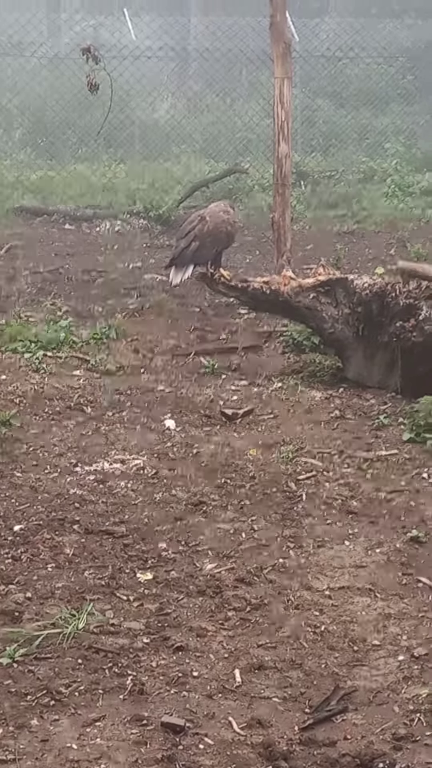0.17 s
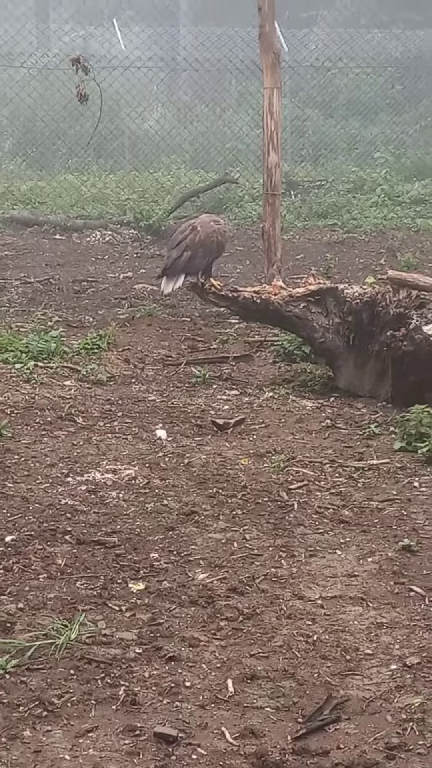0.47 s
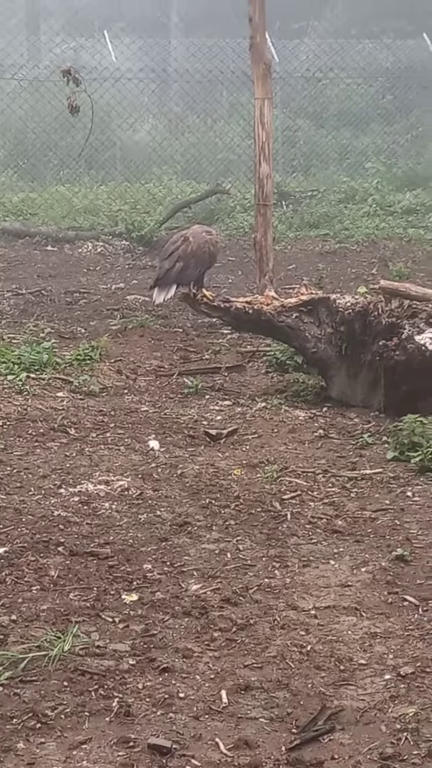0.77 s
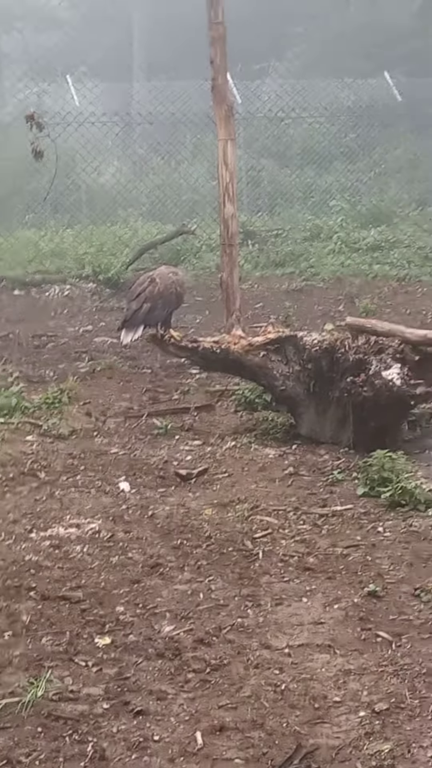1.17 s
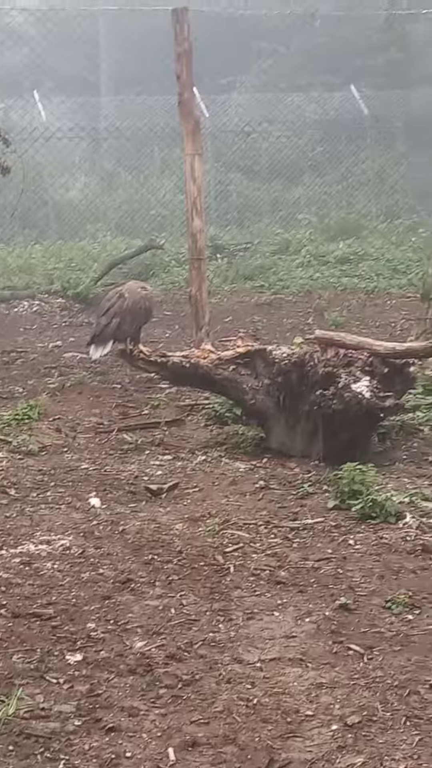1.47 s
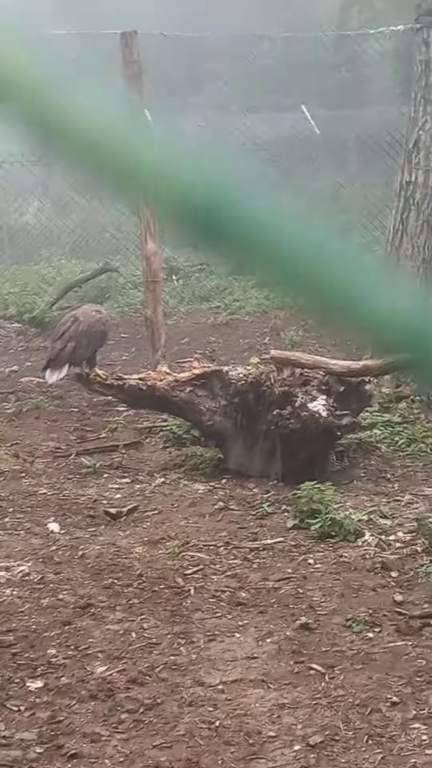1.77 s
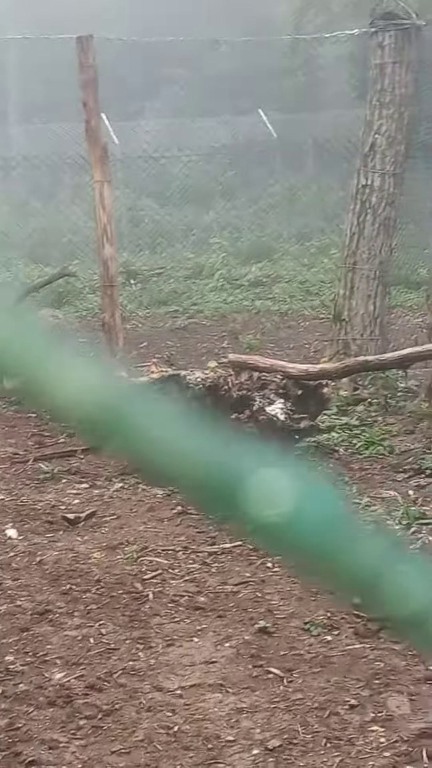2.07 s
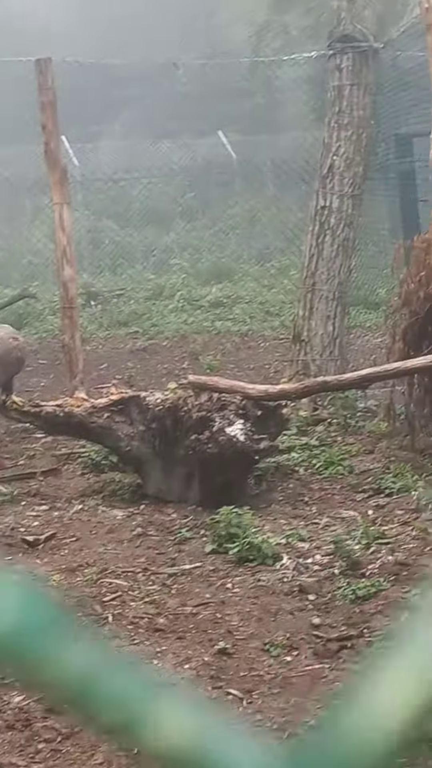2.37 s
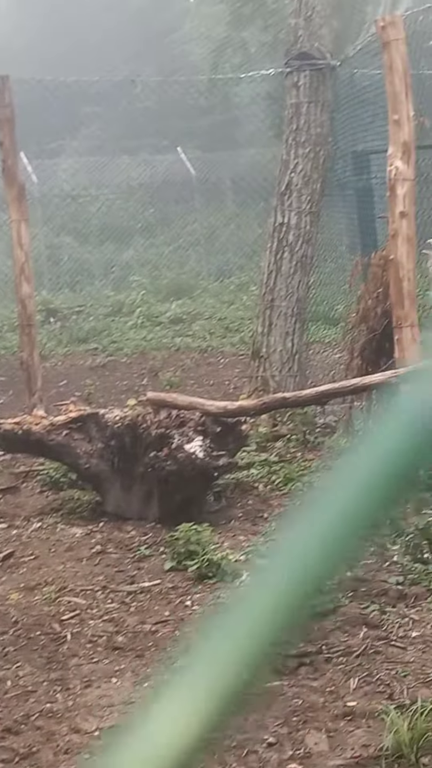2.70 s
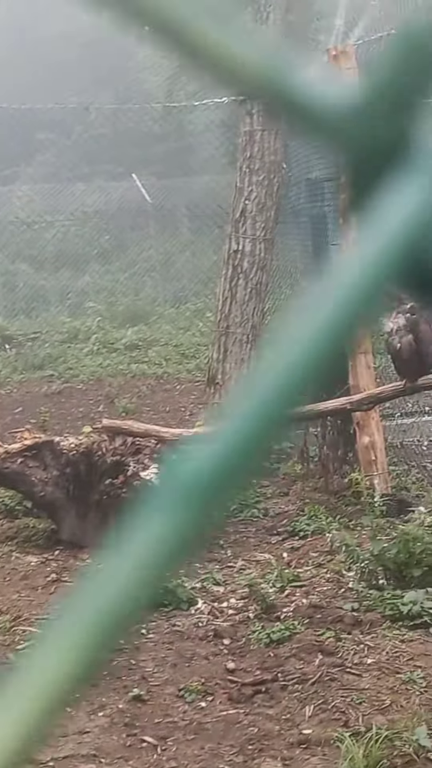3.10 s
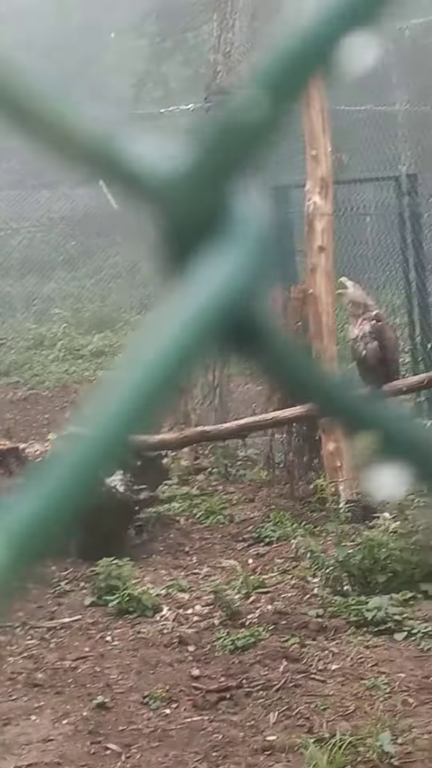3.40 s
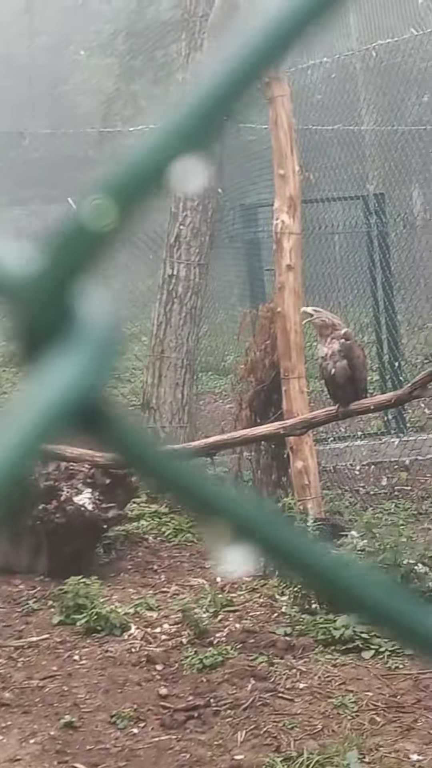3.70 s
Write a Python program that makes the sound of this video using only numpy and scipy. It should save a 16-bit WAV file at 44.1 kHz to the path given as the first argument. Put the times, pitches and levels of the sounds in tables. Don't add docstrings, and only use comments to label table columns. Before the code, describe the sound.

Harsh yelping eagle calls are already under way at the start and continue evenly to the end, scattered by trunks and fence, with thin far-off trills, tiny drips and soft air hiss behind, in close stereo pickup.

```python
import sys
import numpy as np
from scipy import signal
from scipy.fft import rfft, irfft
from scipy.io import wavfile
from scipy.ndimage import uniform_filter1d

SR = 44100
rng = np.random.default_rng(int(sys.argv[2]) if len(sys.argv) > 2 else 0)


def volts_from_decibels(level):
    exponent = np.asarray(level, float) / 20
    return 10 ** exponent


def wav_out(sig):
    wavfile.write(sys.argv[1], SR, np.round(np.clip(np.atleast_2d(sig).T, -1, 1) * 32767).astype(np.int16))


N = 169785
PRE = 8214
JITTER = 0.028


def rms_one(x):
    return x / np.sqrt(np.mean(x ** 2) + 1e-20)


def read(points, x):
    return np.interp(x, *np.transpose(points))


def at_hz(points, hz):
    table_hz, value = np.transpose(points)
    return np.interp(np.log(np.maximum(hz, 1)), np.log(table_hz), value)


def wobble(size, rate_hz):
    lowpass = signal.butter(2, rate_hz, fs=SR, output="sos")
    return rms_one(signal.sosfilt(lowpass, rng.standard_normal(size + 999))[999:])


def tone(hz):
    return np.sin(2 * np.pi * np.cumsum(hz) / SR)


def add(out, start_s, x):
    i = PRE + int(round(start_s * SR))
    out[i:i + len(x)] += x[:len(out) - i]


def left_right(db):
    return volts_from_decibels(np.array([[db / 2], [-db / 2]]))


def stereo(mid, side, alike):
    return np.sqrt(1 + alike) * mid + np.sqrt(1 - alike) * side * [[1], [-1]]


def colour(x, spectrum):
    size = x.shape[-1]
    return irfft(rfft(x) * volts_from_decibels(at_hz(spectrum, np.fft.rfftfreq(size, 1 / SR))), size)


def resonance(x, hz, width_hz):
    r = np.exp(-np.pi * width_hz / SR)
    poles = [1, -2 * r * np.cos(2 * np.pi * hz / SR), r * r]
    return signal.lfilter((1 - r * r) / 2 * np.array([1, 0, -1]), poles, x + 1e-18)


def eagle():
    # start_s, hold_pitch_hz, rise_db, hold_db, fall_db
    yelps = [(-.092, 1950, -32, -36.5, -32.5), (.174, 1950, -39, -39, -26.5), (.415, 1950, -35, -36, -34.5),
             (.651, 1970, -37, -38.5, -36.5), (.887, 1950, -35, -36, -31),
             (1.121, 1950, -36.5, -37.5, -32.5), (1.357, 1950, -41, -42.5, -39),
             (1.565, 1950, -36, -35.5, -32.5), (1.798, 1950, -38.5, -34.5, -36.5),
             (2.027, 1950, -34.5, -36.5, -35), (2.26, 1950, -34, -37, -34.5),
             (2.494, 1950, -38.5, -32.5, -38.5), (2.725, 1927, -35.5, -34.5, -36.5),
             (2.957, 1950, -37.5, -33, -34.5), (3.190, 1950, -35, -33.5, -37.5),
             (3.488, 1950, -38.5, -34.5, -36.5)]
    # rise_s, hold_s, fall_s, croak_s
    pushes = [(0.015, .039, .057, .070), (.016, 0.038, .060, .074), (.016, .040, 0.065, .070),
              (0.014, 0.0374, .059, .066), (0.018, 0.034, .059, .071), (0.021, .038, .058, .071),
              (.014, 0.0221, 0.032, .046), (.016, 0.035, 0.045, .066), (0.013, 0.0383, .060, .069),
              (0.015, 0.0405, .062, .071), (.017, .038, 0.051, .075), (.016, 0.042, 0.045, .069),
              (0.016, .043, .062, 0.072), (0.014, 0.033, .058, .068), (.016, .045, .058, .077),
              (.016, .042, .057, .079)]
    # fall_low_end_db, croak_db, rasp_db
    croaks = [(-6, -9.5, 4.5), (-9, 1.5, 5.5), (-1.5, 2, -3), (-6.5, 4, 2), (-10.5, 7, -2.5), (0, 3, 2.5),
              (4, 4.5, 3), (7, -5.5, -1.5), (-1, 7.5, 0), (9, 0, -0.5), (-2.5, -3, 1), (-1, 1.5, -4),
              (0, -0.5, -2), (8, 5, -2), (0, 2.5, 2.5), (6.5, 2, 3)]
    # time_s, level_db against the voice
    turning = [(0, -32), (1.5, -28), (2.0, -27), (3.85, -30.5)]
    # freq_hz, level_db
    rasp_colour = [(1500, -41), (2600, 6.5), (3000, -6), (3350, -3), (4000, 0), (5200, -15), (6600, -17.5),
                   (7300, -38)]
    # freq_hz, width_hz, level_db
    throat = [(541, 180, -17.5), (1172.5, 229, -6.5), (1603, 250, 3.5), (1996, 463, -0.5), (2298, 147, 1.5),
              (3196, 250, -14), (3880, 260, -19.5)]
    voice, rasp = np.zeros((2, N + PRE))
    t = np.arange(SR // 8) / SR
    for (start_s, hold_hz, rise_db, hold_db, fall_db), peaks, edge in zip(yelps, pushes, croaks):
        low_db, croak_db, rasp_db = edge
        end_s = peaks[-1] + 0.012
        stage = np.interp(t, np.r_[0, peaks, end_s], np.arange(6))
        gate = np.clip(t / 0.002, 0, 1) ** 2 * np.clip((end_s - t) / 0.0087, 0, 1)
        db = push_levels(stage, rise_db, hold_db, fall_db, low_db, croak_db)
        sound, breath = reed(stage, hold_hz, db)
        add(voice, start_s, gate * sound)
        add(voice, start_s, second_hum(stage, hold_db))
        swell_db = hold_db + read(turning, start_s) + rasp_db + 7 + 4.75 * wobble(len(t), 70)
        opening = np.clip(stage / 1.54, 0, 1) ** 2
        add(rasp, start_s, gate * opening * volts_from_decibels(swell_db) * breath)
    out = colour(rasp, rasp_colour)
    for k, (hz, width_hz, db) in enumerate(throat):
        out = out + (-1) ** k * volts_from_decibels(db) * resonance(voice, hz, width_hz)
    return out


def push_levels(stage, rise_db, hold_db, fall_db, low_db, croak_db):
    shoulder_db = -4
    points = [(.3, rise_db - 16), (.62, rise_db - 13), (.82, rise_db + shoulder_db), (1, rise_db),
              (1.17, rise_db + shoulder_db), (1.5, rise_db - 12),
              (1.75, hold_db + shoulder_db), (2, hold_db), (2.2, hold_db + shoulder_db), (2.55, hold_db - 13),
              (3, fall_db - max(low_db, 0)), (3.5, fall_db + min(low_db, 0)), (4, croak_db - 41)]
    return read(points, stage)


def reed(stage, hold_hz, db):
    # stage (1 rise, 2 hold, 3 fall, 4 croak, 5 end), pitch_hz
    whoop = [(0, 1130), (0.8, 1640), (1.2, 1900), (1.5, 2300), (1.8, 1930), (2.3, 2010), (2.7, 2000),
             (3.0, 1590), (3.3, 1280), (3.75, 1220), (3.82, 670), (5.0, 423)]
    size = len(stage)
    rough = np.interp(stage, [2.2, 2.7], [0.6, 1])
    tune_hz = uniform_filter1d(read(whoop, stage), size=60) * hold_hz / 1950
    hz = tune_hz * (1 + JITTER * rough * wobble(size, 600))
    phase = 2 * np.pi * np.cumsum(hz) / SR
    loss_db = np.interp(stage, [2.7, 3.7], [-17, -7])
    buzz = sum(volts_from_decibels(loss_db * (k - 1)) * np.cos(k * phase) for k in range(1, 8))
    rattle = tone(250 * (1 + 0.314 * wobble(size, 58.5)))
    depth = np.interp(stage, [1.3, 1.7, 2.3, 3.1], [0, 0.2, 0.2, 0.75])
    buzz = buzz * (1 + depth * rattle)
    air = (1 + np.cos(phase)) * rng.standard_normal((2, size))
    level = volts_from_decibels(db + 3.3 * rough * wobble(size, 130))
    return np.sqrt(2) * level * (buzz + volts_from_decibels(-8) * rough * air[0]), air[1]


def second_hum(stage, hold_db):
    size = len(stage)
    phase = 2 * np.pi * np.cumsum(1240 * (1 + JITTER * wobble(size, 110))) / SR
    swell = np.sin(np.pi * np.clip(stage / 2.52 - 0.3, 0, 1)) ** 2
    return volts_from_decibels(hold_db - 13.5 + 2.6 * wobble(size, 61)) * swell * np.cos(phase)


def direct_sound(voice):
    # freq_hz, left_lead_rad
    ports = [(1200, 0.083), (1600, 0.96), (2400, 2.06), (3200, 0.16), (4200, 0.14), (6300, 7.6)]
    # time_s, left_minus_right_db
    bearing = [(0, -5), (3.85, -10.5)]
    # delay_s, level_db, left_minus_right_db
    slaps = [(.0047, -13, 3.5), (.0093, -12, -3.5), (0.0214, -14, -2.5)]
    size = len(voice)
    lead = np.exp(1j * at_hz(ports, np.fft.rfftfreq(size, 1 / SR)))
    pan_db = read(bearing, np.arange(-PRE, N) / SR)
    left = irfft(rfft(voice) * lead, size)
    out = np.array([left * volts_from_decibels(pan_db / 2), voice * volts_from_decibels(-pan_db / 2)])
    for delay_s, db, side_db in slaps:
        out = out + volts_from_decibels(db) * left_right(side_db) * np.roll(voice, int(delay_s * SR))
    return out


def trees(x):
    t = np.arange(SR) / SR
    near = volts_from_decibels(-12) * rms_one(volts_from_decibels(-60 * t / 0.24))
    far = volts_from_decibels(-12.5) * rms_one(volts_from_decibels(-60 * t / 0.8))
    shape = (near + far) * np.clip(t / 0.0018 - 1, 0, 1)
    mid, side = rng.standard_normal((2, SR)) * shape / np.sqrt(2 * SR)
    return signal.fftconvolve(x[None], stereo(mid, side, 0.098), axes=1)[:, :len(x)]


def wood_echo(voice):
    # freq_hz, width_hz, level_db
    rings = [(1520, 260, -11.5), (2100, 110, -3.5), (2430, 130, -5.5)]
    # freq_hz, level_db
    wood = [(300, -9), (640, -4), (780, 3), (920, -7), (1300, -3), (2200, -1), (4000, 5), (8000, 10)]
    ringing = voice * volts_from_decibels(-1.0)
    for hz, width_hz, db in rings:
        ringing = ringing + volts_from_decibels(db) * resonance(voice, hz, width_hz)
    return trees(colour(ringing, wood)) * left_right(-3.5)


def hollow_hum(voice):
    # time_s, level_db
    heard = [(0, 5.5), (.55, -1), (.7, 15.5), (.9, -8), (2.2, -6), (2.35, 15.5), (2.7, 10), (3.0, -1.5),
             (3.3, 17.5), (3.6, 0)]
    return volts_from_decibels(read(heard, np.arange(-PRE, N) / SR)) * resonance(voice, 785, 22)


def small_birds():
    # start_s, length_s, pitch_hz, level_db
    trills = [(0.471, 0.61, 6570, -80.5), (0.913, 0.17, 6580, -73), (1.257, 0.081, 8880, -75),
              (1.282, 0.083, 10230, -78.5), (1.454, 0.22, 8750, -80), (1.69, 0.15, 8220, -81),
              (1.874, 0.13, 8180, -80.5), (2.114, 0.18, 8130, -74), (3.643, 0.098, 8880, -66.5),
              (3.678, 0.1, 10000, -86)]
    out = np.zeros(N + PRE)
    t = np.arange(SR // 2) / SR
    for start_s, length_s, hz, db in trills:
        slide = -0.085 * np.exp(-t / 0.03)
        flutter = 0.022 * np.sin(2 * np.pi * 90 * t + 1.4 * wobble(len(t), 60))
        pitch_hz = hz * (1 + slide + flutter + 0.025 * wobble(len(t), 900))
        gate = np.clip(t / 0.02, 0, 1) ** 2 * np.clip((length_s - t) / 0.057, 0, 1)
        level_db = db - 6 * t / length_s + 6.87 * wobble(len(t), 74)
        add(out, start_s, gate * volts_from_decibels(level_db) * tone(pitch_hz))
    return out


def dove():
    # start_s, length_s, pitch_hz, level_db
    coos = [
        (-.05, 0.1, 488, -76),
        (0.119, 0.097, 475.4, -69),
    ]
    out = np.zeros(N + PRE)
    for start_s, length_s, hz, db in coos:
        u = np.linspace(0, 1, int(length_s * SR))
        add(out, start_s, volts_from_decibels(db) * np.sin(np.pi * u) ** 0.19 * tone(hz * (1 - 0.09 * u)))
    return out


def drops():
    # time_s, peak_db, dullness_hz
    falls = [
        (1.254, -45, 1800),
        (1.385, -57.5, 12000),
        (2.19, -68, 12000),
    ]
    out = np.zeros(N + PRE)
    t = np.arange(200) / SR
    for time_s, db, hz in falls:
        tick = rng.standard_normal(len(t)) * np.exp(-t / 0.0012)
        band = signal.butter(2, [hz / 8, hz], "band", fs=SR, output="sos")
        add(out, time_s, volts_from_decibels(db) * signal.sosfilt(band, tick))
    return out


def hiss(spectrum, patchy_db):
    # freq_hz, likeness_0_to_1
    likeness = [(35, 0.6), (60, 0.8), (130, 0.06), (300, 0.4), (1000, 0.1), (8000, .0)]
    hz = np.fft.rfftfreq(N, 1 / SR)
    mid, side = rng.standard_normal((2, N))
    both = stereo(rfft(mid), rfft(side), np.clip(at_hz(likeness, hz), 0, 1))
    noise = irfft(both * volts_from_decibels(at_hz(spectrum, hz)) * (hz > 12), N)
    swell = np.interp(np.arange(N), np.linspace(0, N, num=30), rng.standard_normal(30))
    return rms_one(noise * volts_from_decibels(patchy_db * swell))


def distant_traffic():
    # freq_hz, level_db
    road = [(30, -33.5), (40, -18), (52, -4.5), (62, 0), (83, 0), (110, -6), (180, -15.5), (330, -25.5),
            (450, -47.5)]
    return volts_from_decibels(-73) * hiss(road, patchy_db=1.5) * volts_from_decibels([[0.6], [-0.6]])


def air_hiss():
    # freq_hz, level_db
    air = [(300, -0.5), (1000, -4), (2800, -14), (5200, -17), (6800, -4.5), (7300, -32), (11500, -15),
           (15300, -15)]
    return volts_from_decibels(-78) * hiss(air, patchy_db=-2.0)


def scene():
    voice = eagle()
    birds = small_birds() + dove()
    near = direct_sound(voice) + wood_echo(voice) + hollow_hum(voice)
    far = volts_from_decibels(-4.5) * np.array([birds, np.roll(birds, 3)]) + volts_from_decibels(8) * trees(birds)
    return (near + far + drops())[:, PRE:] + distant_traffic() + air_hiss()


def band_limit(x):
    return signal.sosfilt(signal.butter(12, 15370, fs=SR, output="sos"), x)


def record(dry):
    # freq_hz, level_db
    port_dip = [(6950, 0), (7200, -9), (7650, -9), (7950, 0)]
    top_cut = signal.cheby2(12, 50, 15900, fs=SR, output="sos")
    return band_limit(signal.sosfilt(top_cut, colour(dry, port_dip)))


dry = scene()
out = record(dry)
wav_out(out)
```